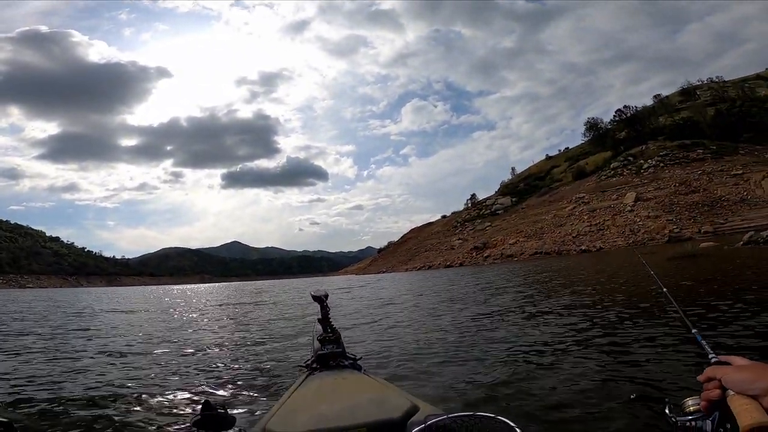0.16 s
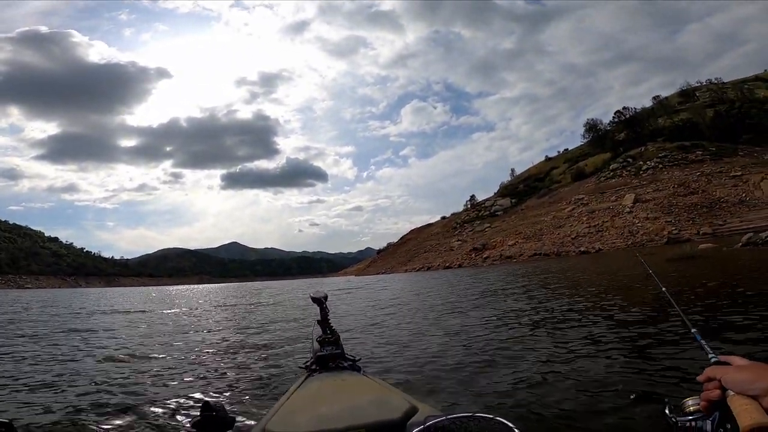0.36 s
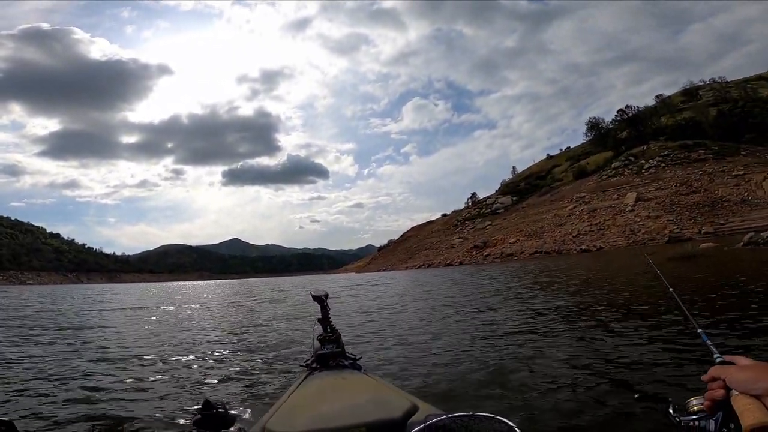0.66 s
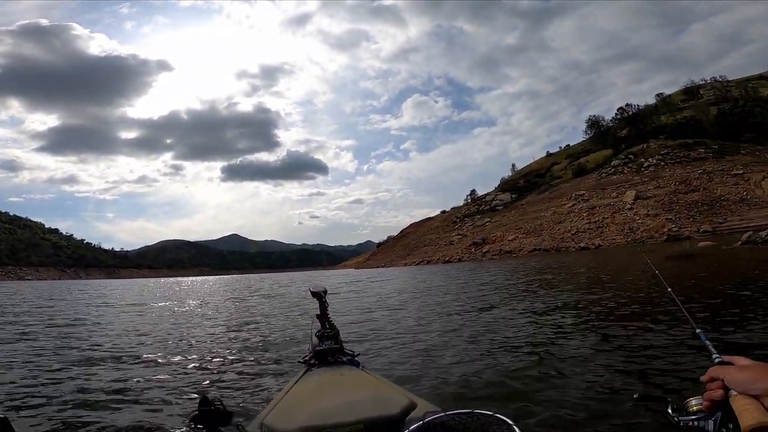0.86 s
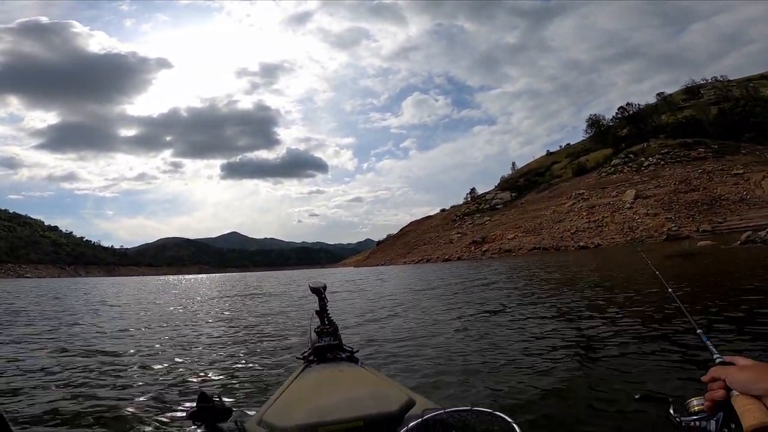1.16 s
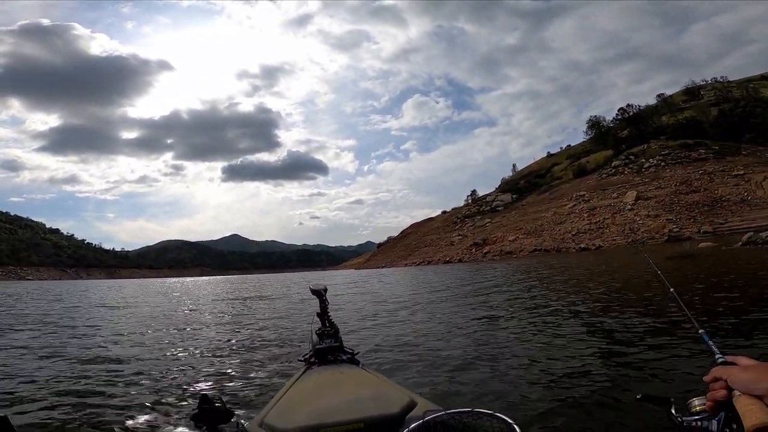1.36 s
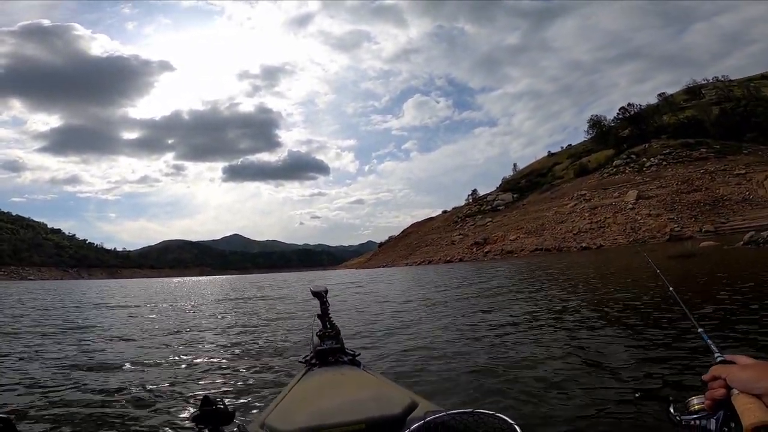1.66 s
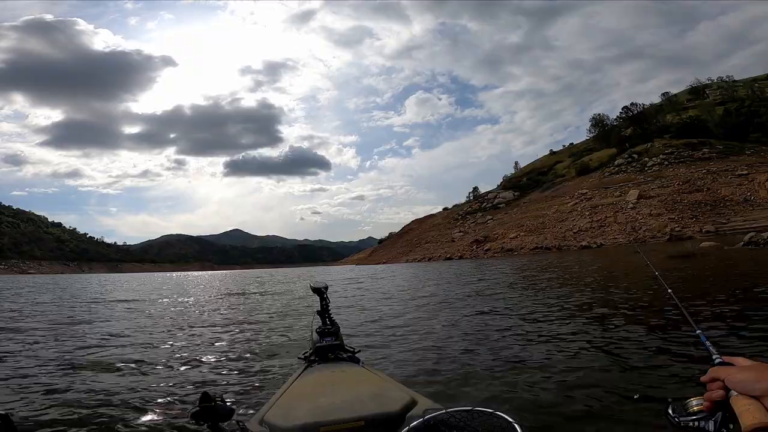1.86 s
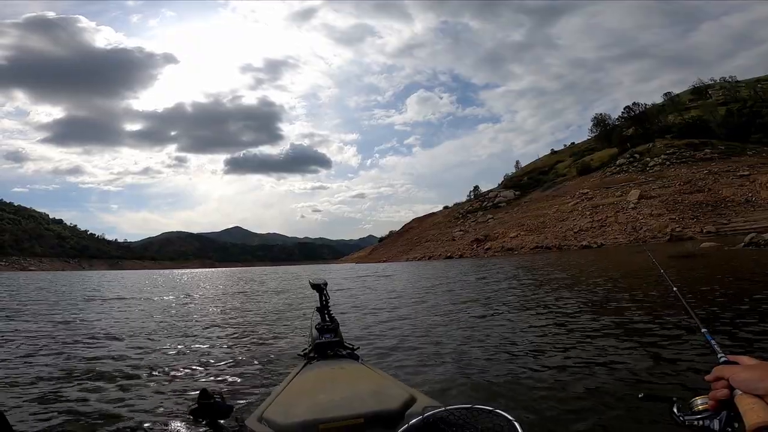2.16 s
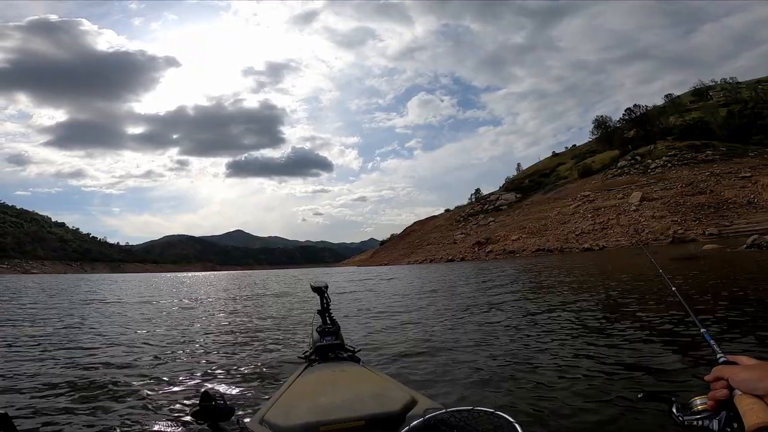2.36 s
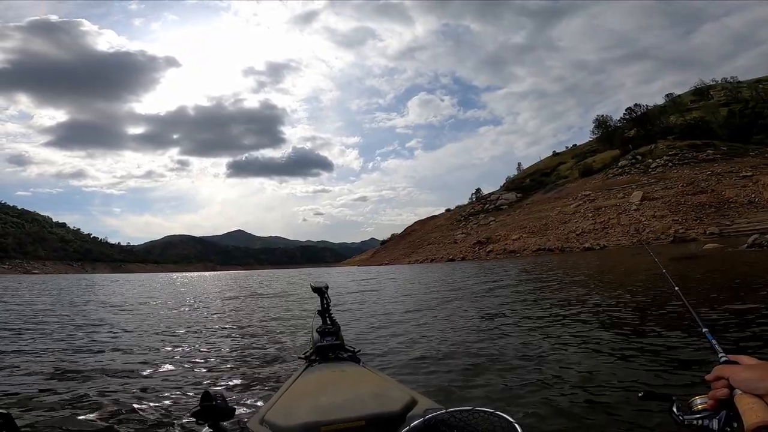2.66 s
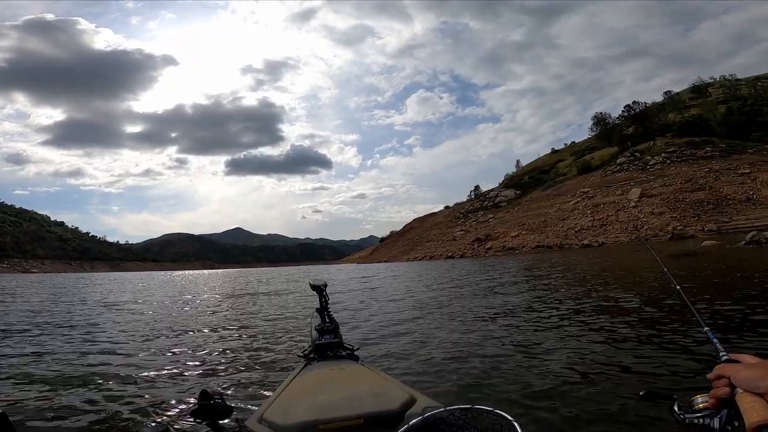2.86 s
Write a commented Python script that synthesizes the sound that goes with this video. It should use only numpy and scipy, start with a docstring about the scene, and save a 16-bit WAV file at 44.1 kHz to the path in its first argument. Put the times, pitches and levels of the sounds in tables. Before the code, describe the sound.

Small waves lap quietly against a kayak hull close by, trickling, bubbling and dripping throughout. Hollow slaps come near 0.2 and 0.8 seconds, while a low breeze rumble peaks around 0.6. Light splashes, drips and knocks cluster from 1.2 to 1.7 seconds. A soft wash then swells along the side, peaking with one sharp plip at 2.5, followed by a few more drips and small splashes.

```python
"""On open water in a drifting kayak, one microphone close to the plastic hull.
Small waves trap air under the hull and slap it hollowly; bubbles ring, drips tick, a fine trickle runs.
A soft wash slides along the side, swells in the second half and peaks with one sharp plip.
Underneath, the hull drones and a light breeze rumbles on the microphone."""
import sys
import numpy as np
from scipy import signal
from scipy.fft import rfft, irfft, next_fast_len
from scipy.io import wavfile
from scipy.ndimage import uniform_filter1d, map_coordinates

SR = 44100
rng = np.random.default_rng(int(sys.argv[2]) if len(sys.argv) > 2 else 0)


def int16_out(signal):
    """Quantize to a 16-bit WAV file."""
    q = np.round(np.clip(np.atleast_2d(signal).T, -1, 1) * 32767)
    wavfile.write(sys.argv[1], SR, q.astype(np.int16))


N = 132300

# spectra of low gurgle, fine fizz, splashing water and a droplet's tick: freq_hz, gain_db
GURGLE_SPECTRUM = [(110, -3.5), (180, 4.5), (280, -1), (420, -3.5), (560, -2.5), (780, -6.5), (1100, -15.5),
                   (2000, -40), (5000, -100)]
FIZZ_SPECTRUM = [(1800, -25), (3400, -2), (5000, -2.5), (6400, -1.5), (7400, -6), (8400, -6),
                 (10000, -17.5), (11500, -32), (13000, -20), (14300, -37), (15000, -40)]
SPLASH_SPECTRUM = [(200, -17.5), (700, -1), (1800, 0), (3500, 2), (6000, -0.5), (8500, -20), (10000, -21),
                   (11500, -53), (14000, -40), (15500, -48)]
TICK_SPECTRUM = [(400, -10), (1800, 6.5), (3700, 5), (6000, -7), (9000, -5), (11000, -21), (15000, -32)]
BUBBLE_RISE = 0.19  # fraction by which a bubble's pitch climbs as it nears the surface


def amp(db):
    """Decibels to gain."""
    return 10 ** (np.asarray(db) / 20)


def unit(x):
    """Scale to rms 1."""
    return x / np.sqrt(np.mean(x ** 2) + 1e-20)


def fader(points):
    """One gain per sample from (time_s, level_db) points."""
    time_s, level_db = np.transpose(points)
    return amp(np.interp(np.arange(N) / SR, time_s, level_db))


def wobble(rate):
    """A smooth random curve, rate knots a second."""
    return map_coordinates(rng.standard_normal(2048), [np.arange(N) * rate / SR], mode="wrap")


def coloured(x, spectrum):
    """x shaped by (freq_hz, gain_db) points, at rms 1."""
    hz, db = np.transpose(spectrum)
    freqs = np.fft.rfftfreq(N, 1 / SR)
    gain = amp(np.interp(np.log(freqs + 1), np.log(hz), db))
    return unit(irfft(rfft(x) * gain, N))


def noise(spectrum):
    """Coloured noise of rms 1."""
    return coloured(rng.standard_normal(N), spectrum)


def patchy(x, depth_db):
    """Give x small patches of random gain in time and pitch, at rms 1."""
    cells = signal.stft(x, nperseg=256)[2]
    patches = uniform_filter1d(rng.standard_normal(cells.shape), 7, axis=0)
    patches = unit(uniform_filter1d(patches, 5, axis=1))
    return unit(signal.istft(cells * amp(depth_db * patches), nperseg=256)[1][:N])


def add(track, start_s, sound):
    """Mix a sound into the track."""
    start = max(0, int(start_s * SR))
    part = track[start:start + len(sound)]
    part += sound[:len(part)]


def ring(hz, t60, attack_cycles, rise):
    """An air pocket or hull mode rings down while its pitch climbs by the fraction rise."""
    t = np.arange(int(t60 * SR) + 8) / SR
    env = amp(-60 * t / t60) * (1 - np.exp(-(t * hz / attack_cycles) ** 2))
    return env / env.max() * np.sin(2 * np.pi * hz * t * (1 + rise * t / t60 / 2))


def swarm(centre_hz, spread, cycles, scatter_db, count):
    """Many small bubbles of random time, pitch and size, at rms 1."""
    out = np.zeros(N)
    moments = rng.random(count)
    traits = np.clip(rng.standard_normal((count, 3)), -2, 2)
    for when, (pitch, size, life) in zip(moments, traits):
        hz = min(centre_hz * np.exp(spread * pitch), SR / 4)
        t60 = cycles * np.exp(life / 2) / hz
        bubble = ring(hz, t60, attack_cycles=0.32, rise=BUBBLE_RISE)
        add(out, when * N / SR, amp(scatter_db * size) * bubble)
    return unit(out)


def burst(db, t60, attack_s=0.0026):
    """Envelope of a splash: quick rise, steady decay."""
    t = np.arange(SR // 4) / SR
    return amp(db - 60 * t / t60) * (1 - np.exp(-t / attack_s))


def hiss():
    """The microphone's own faint, steady hiss."""
    spectrum = [(1000, -5), (3000, 2), (8500, -3.5), (10000, -11), (11500, -15.5), (13000, -13),
                (14400, -17), (15400, -22)]  # freq_hz, gain_db
    return amp(-86.5) * noise(spectrum)


def rumble():
    """Breeze on the microphone and the drone of the hollow hull."""
    # rise and fall of each: time_s, level_db
    breeze_levels = [(0, -57.5), (.34, -63.5), (.39, -44.5), (.44, -53), (.49, -39.5), (.56, -53.5),
                     (.62, -35.5), (.76, -52.5), (.92, -46), (1.06, -61), (1.24, -48), (1.5, -53),
                     (1.75, -58.5), (2.03, -62), (2.12, -49), (2.27, -63.5), (2.52, -59), (3, -61.5)]
    drone_levels = [(0, -53.5), (.06, -61), (.3, -55), (.42, -54), (.56, -57), (.63, -45.5), (.71, -51),
                    (.9, -55), (1.1, -55.5), (1.25, -51.5), (1.54, -49), (1.63, -57.5), (1.73, -51),
                    (1.95, -61.5), (2.16, -53), (2.28, -57), (2.6, -59.5), (2.7, -52), (3, -56.5)]
    # their spectra: freq_hz, gain_db
    breeze_spectrum = [(10, -13), (22, -4), (42, -4), (56, -8.5), (90, -19.5), (160, -35), (400, -67),
                       (1000, -120)]
    drone_spectrum = [(40, -27.5), (75, 2), (95, -2), (115, 3.5), (150, -10.5), (195, -11.5), (280, -25.5),
                      (500, -53), (1500, -75), (4000, -120)]
    breeze = amp(1.5) * fader(breeze_levels) * noise(breeze_spectrum)
    drone = amp(-1) * fader(drone_levels) * noise(drone_spectrum)
    return breeze + drone


def crackle(scatter_db, count, t60=0.005):
    """Tiny droplets crack at random moments, at rms 1."""
    env, t = np.zeros(N), np.arange(SR // 50) / SR
    for when, size in rng.random((count, 2)):
        add(env, when * N / SR, amp(-scatter_db * size - 60 * t / t60))
    return unit(env * noise(TICK_SPECTRUM))


def wash():
    """Water slides along the hull: a soft rush, topped by fizz, bursting bubbles and airy spray."""
    # swell of each layer: time_s, level_db
    rush_levels = [(0, -69.5), (.2, -75.5), (.52, -67), (.63, -66.5), (.8, -75), (1.0, -74.5),
                   (1.13, -74.5), (1.24, -70.5), (1.39, -66.5), (1.68, -65.5), (1.75, -63), (2.0, -62.5),
                   (2.35, -59), (2.52, -60.5), (2.6, -65.5), (2.87, -67.5), (3.0, -72)]
    fizz_levels = [(0, -74.5), (.22, -78), (.31, -75.5), (.54, -71.5), (.66, -75), (.76, -82.5),
                   (.9, -75.5), (1.01, -86), (1.09, -74), (1.19, -76.5), (1.23, -74.5), (1.39, -72.5),
                   (1.57, -75.5), (1.74, -70.5), (1.93, -72.5), (2.36, -71), (2.47, -65.5), (2.55, -71),
                   (2.59, -79), (2.75, -74.5), (2.9, -70), (3, -71.5)]
    air_levels = [(.45, -103), (.55, -85), (.68, -105), (1.6, -102), (1.8, -91.5), (2.47, -87),
                  (2.56, -100), (3, -95)]
    # spectra of the rush and the airy spray: freq_hz, gain_db
    rush_spectrum = [(300, -22), (760, -8), (1100, -4), (1450, 0), (1850, 1), (2300, -8), (3200, -10),
                     (4500, -19), (8000, -40), (12000, -100)]
    air_spectrum = [(5000, -23), (8500, 2), (11500, -8), (14000, -8), (15400, -25)]
    rush = amp(-0.5 + 1.14 * wobble(44.4)) * patchy(noise(rush_spectrum), depth_db=1.5)
    fizz = amp(-4 + 2.5 * wobble(120)) * patchy(noise(FIZZ_SPECTRUM), depth_db=2.0)
    pops = swarm(centre_hz=6080, spread=0.478, cycles=55, scatter_db=5.0, count=300)
    air = noise(air_spectrum)
    fizz += amp(-7.5) * coloured(pops, FIZZ_SPECTRUM)
    fizz += amp(-9) * crackle(scatter_db=16, count=260)
    return fader(rush_levels) * rush + fader(air_levels) * air + fader(fizz_levels) * fizz


def trickle():
    """Waves run off the hull: small bubbles tinkle and larger ones gurgle at the waterline."""
    # ebb and flow of each: time_s, level_db
    tinkle_levels = [(0, -71.5), (.25, -79), (.52, -68), (.75, -74), (1.0, -74.5), (1.2, -71.5),
                     (1.37, -66), (1.62, -66.5), (1.78, -69), (2.2, -68.5), (2.55, -77), (2.7, -64),
                     (3, -71.5)]
    gurgle_levels = [(0, -66.5), (.08, -70), (.48, -64.5), (.74, -67), (.92, -66.5), (1.07, -68),
                     (1.28, -72.5), (1.37, -61.5), (1.53, -65), (1.7, -64), (2.1, -62), (2.48, -62.5),
                     (2.75, -69.5), (3, -63.5)]
    tinkle = swarm(centre_hz=2097, spread=0.5005, cycles=32.4, scatter_db=2.5, count=900)
    glugs = swarm(centre_hz=540.7, spread=0.3364, cycles=30.0, scatter_db=4.5, count=200)
    gurgle = amp(-4) * glugs + amp(-0.5) * noise(GURGLE_SPECTRUM)
    return fader(tinkle_levels) * tinkle + fader(gurgle_levels) * gurgle


def splashes():
    """Wavelets break into a splatter of droplets and a finer spray."""
    splatters = [(0.509, -68.5, 0.28), (.699, -65, 0.067), (.753, -73, 0.024), (0.867, -62, 0.14),
                 (0.895, -72.5, 0.37), (1.219, -62, 0.15), (1.33, -59, 0.084), (1.35, -57, 0.1),
                 (1.374, -66, 0.24), (1.463, -53, 0.14), (1.553, -58, 0.062), (1.62, -57, 0.093),
                 (2.686, -67, 0.087), (2.798, -58, 0.04)]  # start_s, level_db, t60_s
    sprays = [(.63, -71), (0.816, -74), (.887, -70), (1.035, -72), (1.084, -70.5), (1.35, -71),
              (1.498, -62), (1.652, -62.5), (2.44, -70), (2.527, -70), (2.607, -65), (2.633, -65.5),
              (2.689, -68), (2.798, -63.5), (2.853, -63.5)]  # start_s, level_db
    splatter_env, spray_env = np.zeros(N), np.zeros(N)
    for start_s, db, t60 in splatters:
        add(splatter_env, start_s, burst(db, t60))
    for start_s, db in sprays:
        add(spray_env, start_s, burst(db, t60=0.097))
    drops = swarm(centre_hz=2595, spread=0.55, cycles=11, scatter_db=5, count=1700)
    mist = swarm(centre_hz=6550, spread=0.22, cycles=41, scatter_db=4, count=1000)
    return splatter_env * coloured(drops, SPLASH_SPECTRUM) + spray_env * coloured(mist, FIZZ_SPECTRUM)


def ticks(t60=0.015):
    """Droplets land on the hull with a brief crack."""
    landings = [(0.327, -65), (0.344, -60.5), (0.4382, -57.5), (1.163, -63), (1.221, -62), (1.254, -60),
                (1.3066, -61), (1.3485, -54), (1.3768, -49.5), (1.498, -59), (1.513, -59), (1.554, -62),
                (1.588, -61), (1.6192, -60), (1.7254, -52.5), (1.8118, -56), (2.213, -51), (2.4399, -55),
                (2.8308, -59), (2.9, -60.5), (2.921, -59)]  # start_s, level_db
    env, t = np.zeros(N), np.arange(SR // 20) / SR
    for start_s, db in landings:
        add(env, start_s, amp(db - 60 * t / t60))
    return env * noise(TICK_SPECTRUM)


def bubbles():
    """Single bubbles and drips near the microphone, their ring shaken by the moving water."""
    plinks = [(.119, 6840, -61.5, .014), (.148, 747, -53.5, 0.078), (.327, 1740, -51.5, 0.0069),
              (.479, 1042, -51.5, 0.046), (0.504, 1160, -56, 0.04), (0.524, 1383, -54.5, 0.064),
              (0.696, 1700, -61, 0.033), (.832, 4095, -62.5, 0.094), (.834, 750, -57.5, 0.077),
              (.892, 1960, -56, 0.072), (1.034, 7080, -66.5, .06), (1.230, 627, -57, 0.13),
              (1.280, 5930, -61, .019), (1.289, 665, -55, 0.1), (1.3295, 2050, -51, 0.031),
              (1.340, 975, -52.5, 0.083), (1.350, 689, -53.5, 0.15), (1.372, 1180, -52, 0.025),
              (1.375, 4730, -55, 0.04), (1.377, 8260, -60.5, 0.045), (1.404, 4100, -59, .025),
              (1.428, 637, -55, 0.17), (1.465, 2670, -52, 0.03), (1.4796, 1760, -44.5, 0.023),
              (1.515, 6400, -55.5, .02), (1.553, 644, -55.5, 0.1), (1.565, 2500, -52, 0.012),
              (1.587, 2210, -42.5, 0.0045), (1.606, 2620, -56, .014), (1.634, 4220, -57, .015),
              (1.654, 7450, -60, .02), (2.125, 571.6, -51, 0.13), (2.144, 552, -48.5, 0.064),
              (2.527, 6760, -60, .03), (2.608, 8070, -64, .022), (2.612, 607, -53, 0.066),
              (2.637, 462, -54.5, 0.11), (2.689, 1832, -52, 0.038), (2.768, 1950, -55, 0.02),
              (2.801, 3180, -46.5, 0.015), (2.925, 678, -57, 0.11), (2.976, 1854, -53, 0.029)]  # start_s, pitch_hz, level_db, t60_s
    out = np.zeros(N)
    for start_s, hz, db, t60 in plinks:
        shake = 1 + 0.53 * wobble(min(hz / 4, 600))
        tone = amp(db) * ring(hz, t60, attack_cycles=1.37, rise=BUBBLE_RISE)
        add(out, start_s, tone * shake[:len(tone)])
    return out


def plip(start_s=2.4865, crack_db=-45.5, crack_t60=0.015):
    """One close, sharp plip: a faint crack and a very short ring, the highest tones first."""
    tones = [(0, 6200, -53, 0.004), (.0002, 3260, -43, 0.0035), (.0003, 1420, -34, .013),
             (.001, 870, -34, 0.0059)]  # delay_s, pitch_hz, level_db, t60_s
    out, crack_env = np.zeros(N), np.zeros(N)
    t = np.arange(SR // 20) / SR
    for delay_s, hz, db, t60 in tones:
        add(out, start_s + delay_s, amp(db) * ring(hz, t60, attack_cycles=1.8, rise=0))
    add(crack_env, start_s, amp(crack_db - 60 * t / crack_t60))
    return out + crack_env * noise(SPLASH_SPECTRUM)


def slaps(splash_db=-22.5, splash_t60=0.05):
    """A wave traps air under the hull: a short hollow knock and a dull splash, and the hull rings on."""
    knocks = [(0.1558, 244, -39, 0.034), (.441, 456, -48, 0.016), (.794, 552, -40.5, 0.024),
              (.796, 334, -41.5, 0.02), (0.8928, 225, -33, 0.01), (0.8938, 373, -45.5, 0.035),
              (.956, 226, -45, 0.029), (1.452, 167, -42, 0.09), (1.468, 350, -48.5, .08),
              (1.487, 467, -51, 0.076), (1.529, 500, -57, 0.036), (1.53, 243, -42.5, 0.029),
              (1.547, 161, -42.5, 0.065), (1.567, 435, -40.5, 0.011), (2.494, 476, -49, 0.083),
              (2.794, 332, -44, 0.03)]  # start_s, pitch_hz, level_db, t60_s
    hull_modes = [(117, -17, 0.15), (192.8, -21.5, 0.22), (285, -21, .26), (469, -24.5, .15)]  # pitch_hz, level_db against the knock, t60_s
    out, splash_env = np.zeros(N), np.zeros(N)
    t = np.arange(SR // 10) / SR
    for start_s, hz, db, t60 in knocks:
        add(out, start_s, amp(db) * ring(hz, t60, attack_cycles=0.28, rise=0.12))
        add(splash_env, start_s, amp(db + splash_db - 60 * t / splash_t60))
        for mode_hz, mode_db, mode_t60 in hull_modes:
            detune, size = rng.standard_normal(2)
            mode = ring(mode_hz * (1 + 0.029 * detune), mode_t60, attack_cycles=1.27, rise=0.045)
            add(out, start_s, amp(db + mode_db + 1.7 * size) * mode)
    return out + splash_env * noise(GURGLE_SPECTRUM)


def hull_answer(x, level_db=-13.5, t60=0.092):
    """The short reverberation of hull and deck."""
    t = np.arange(SR // 5) / SR
    tail = noise(SPLASH_SPECTRUM)[:len(t)] * amp(-60 * t / t60)
    return amp(level_db) * signal.fftconvolve(x, tail / np.linalg.norm(tail))[:N]


def scene():
    """Close water, dull at the very top, with the hull's answer, over wash, rumble and hiss; mono."""
    near = bubbles() + slaps() + ticks() + plip() + trickle() + splashes()
    lowpass = signal.butter(4, 9480, fs=SR, output="sos")
    near = signal.sosfilt(lowpass, near)
    return (near + hull_answer(near) + wash() + rumble() + hiss())[None]


def record(dry):
    """Nothing above 15.5 kHz is kept."""
    padded = next_fast_len(N + SR // 2)
    in_band = np.fft.rfftfreq(padded, 1 / SR) < 15500
    return irfft(rfft(dry, padded) * in_band, padded)[..., :N]


dry = scene()
out = record(dry)
int16_out(out)
```